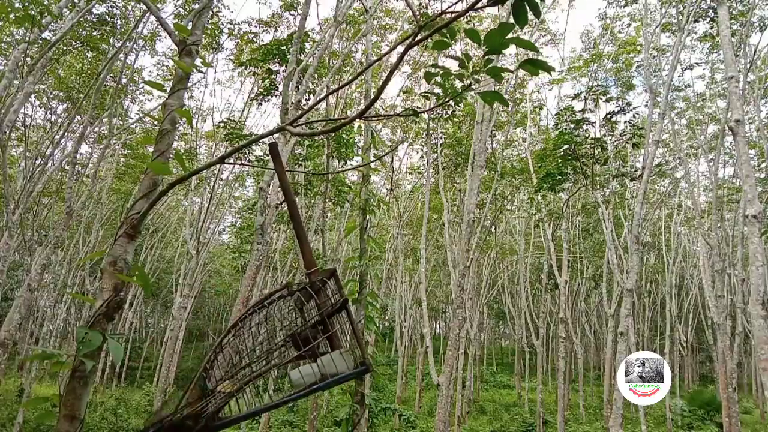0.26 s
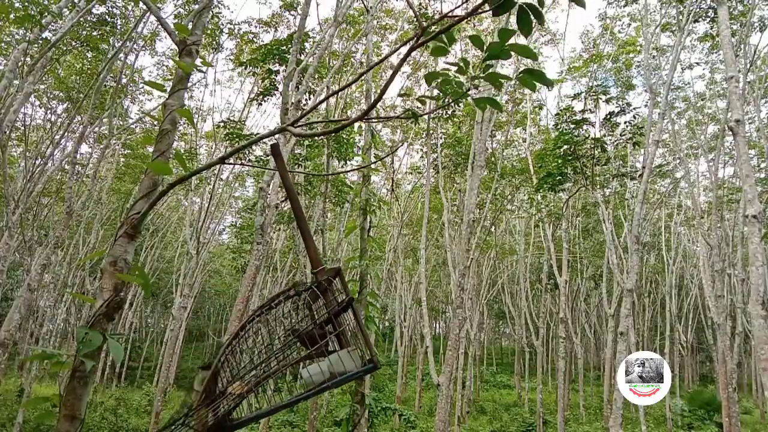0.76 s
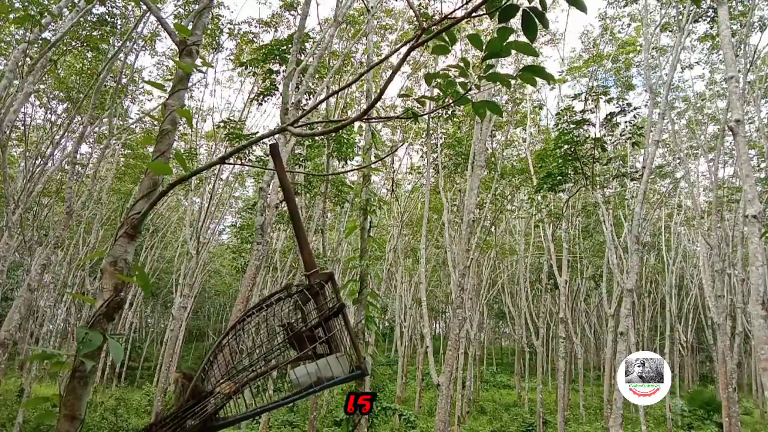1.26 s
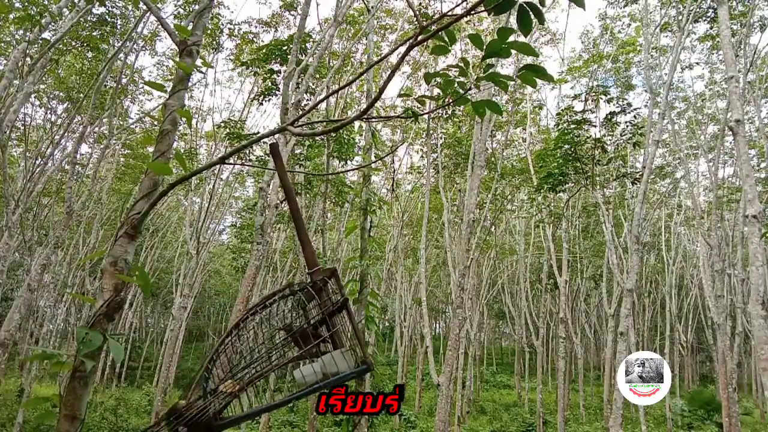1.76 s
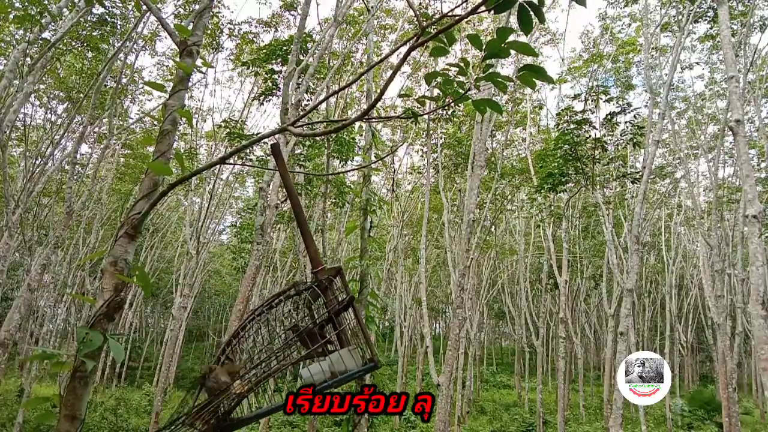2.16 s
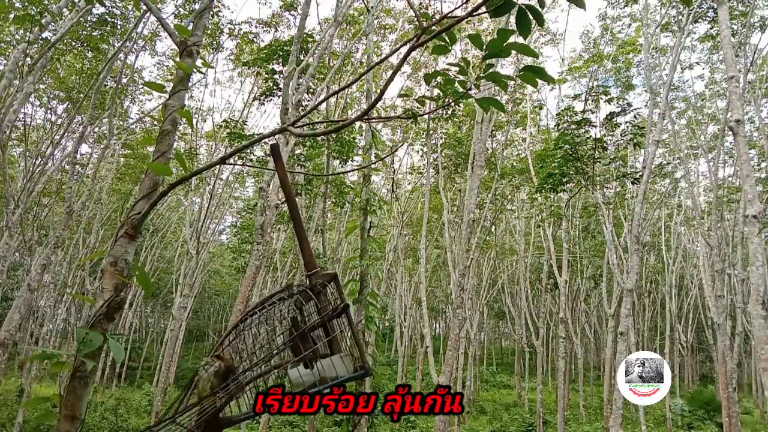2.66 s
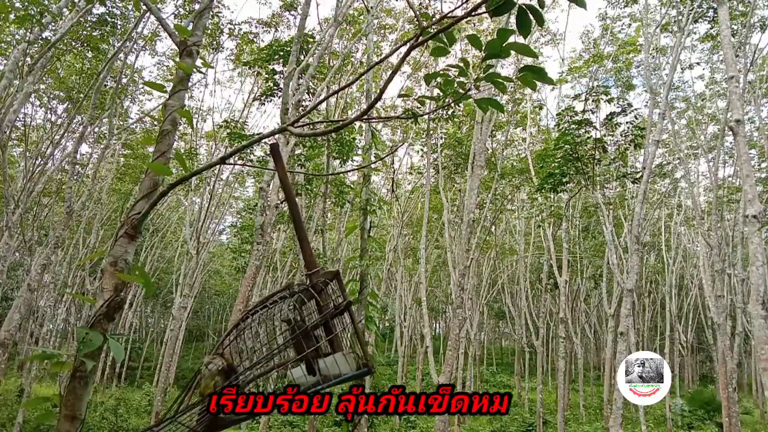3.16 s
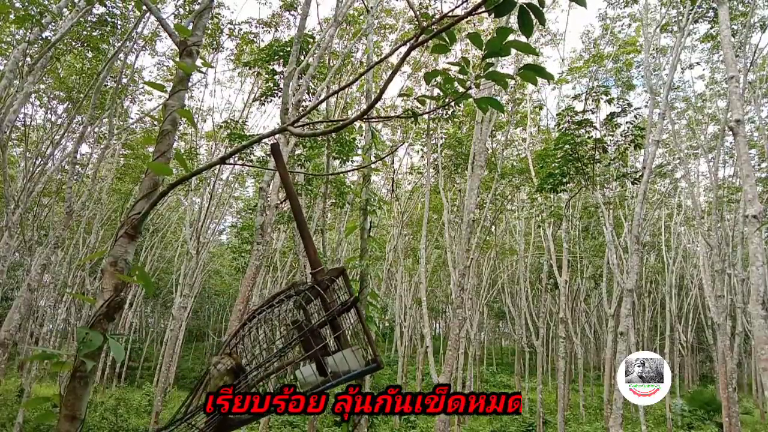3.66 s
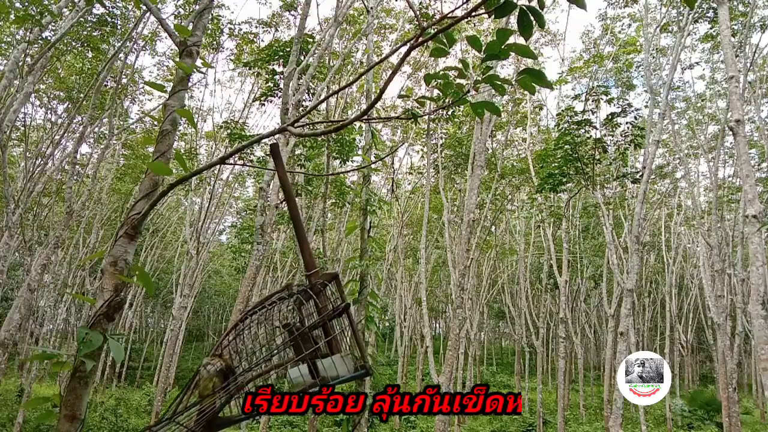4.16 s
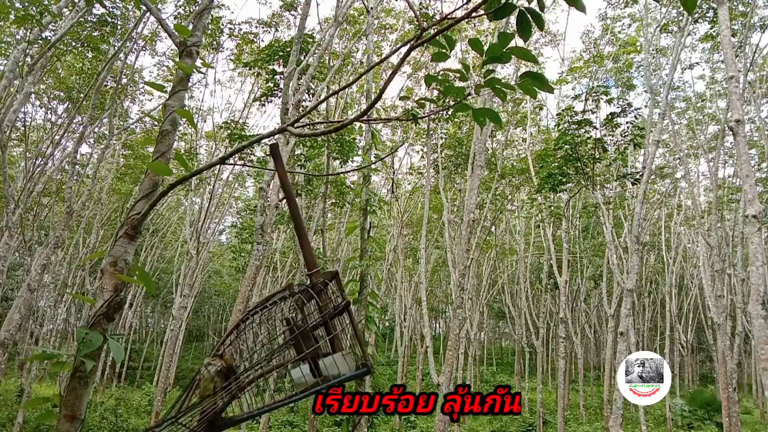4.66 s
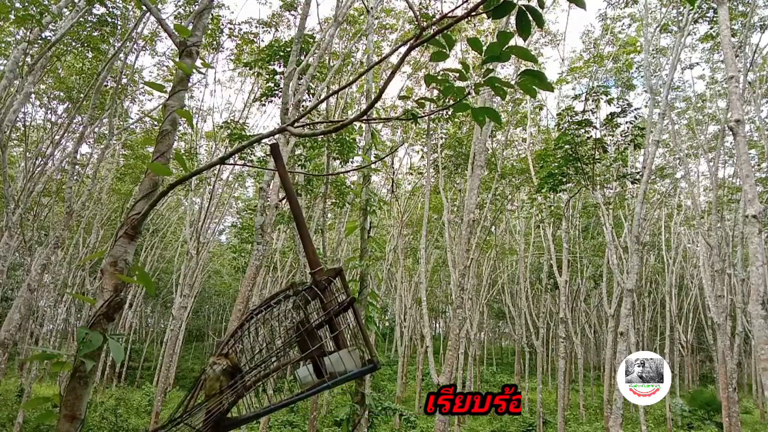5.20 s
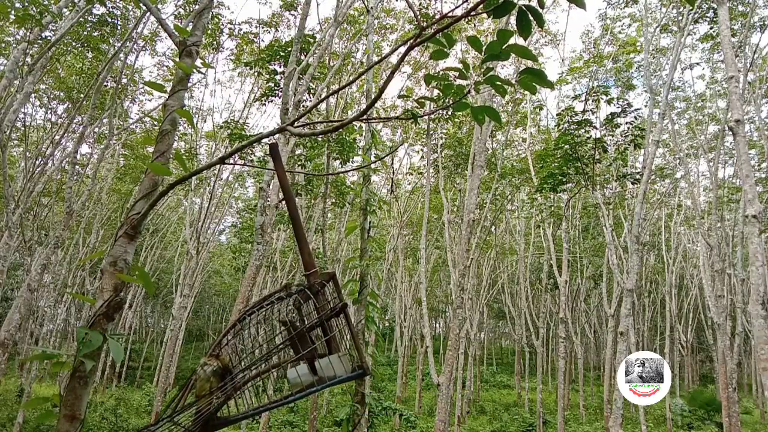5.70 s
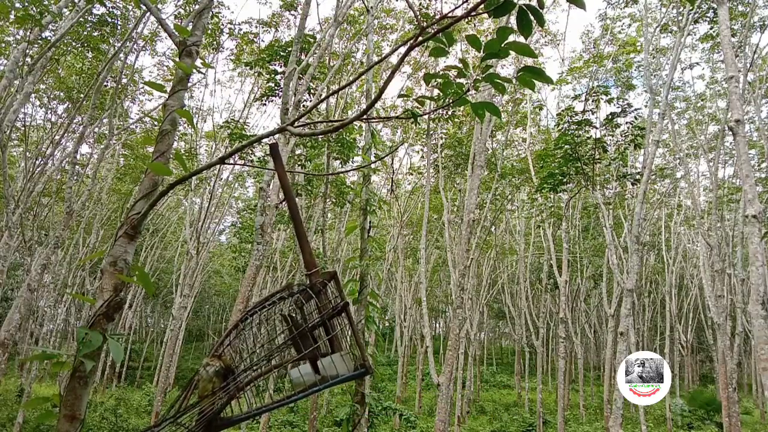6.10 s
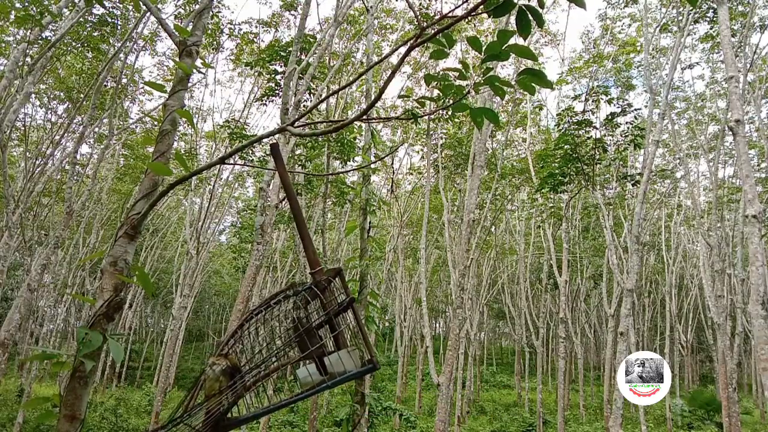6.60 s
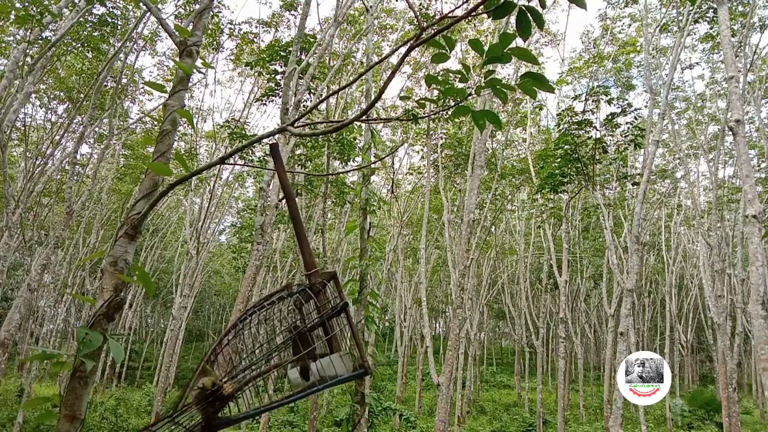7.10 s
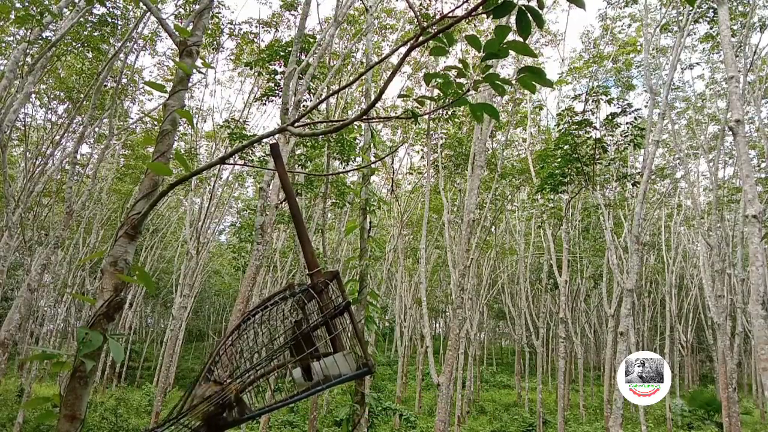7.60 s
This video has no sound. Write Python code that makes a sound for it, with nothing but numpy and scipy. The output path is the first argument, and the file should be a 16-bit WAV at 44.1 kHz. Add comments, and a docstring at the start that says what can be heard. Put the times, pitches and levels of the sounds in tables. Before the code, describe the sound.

Outdoors in a stand of trees, insects hold a thin, high buzz over a faint hiss of leaves. In the centre, a small bird flaps and scratches against its wire cage with sharp clicks and rustles. One loud upward chirp echoes briefly off the trunks. After a pause comes a softer run of twittering, slightly hoarse notes, followed by more fluttering and feathers brushing the mesh.

```python
"""A songbird in a small cage trap among trees, with insects buzzing and leaves hissing throughout.
First it scrabbles about, slapping its wings on the wire mesh and making the wires ring.
Near 2.7 s it gives one loud rising call, which echoes from the trunks. From about 4 s it sings a
quieter, chattering song of fast-bending notes. As the song ends, near 6.8 s, it is fluttering
again: its wings push soft puffs of air and its feathers scratch the mesh."""
import sys
import numpy as np
from scipy import signal
from scipy.fft import rfft, irfft, next_fast_len
from scipy.io import wavfile
from scipy.ndimage import uniform_filter1d, map_coordinates

SR = 44100
rng = np.random.default_rng(int(sys.argv[2]) if len(sys.argv) > 2 else 0)


def unload_wav(signal):
    """Save mono or channel-first audio to the path in sys.argv[1] as 16-bit WAV at rate SR, clipped to [-1, 1]."""
    wavfile.write(
        sys.argv[1],
        SR,
        np.round(np.clip(np.atleast_2d(signal).T, -1, 1) * 32767).astype(np.int16),
    )


N = 346185
TIME = np.arange(N) / SR


def amp(db):
    """Turn decibels into a number to multiply by."""
    return 10 ** (np.asarray(db) / 20)


def unit(x):
    """Scale a sound to an average (RMS) strength of 1."""
    return x / np.sqrt(np.mean(x ** 2) + 1e-20)


def noise():
    """Plain white hiss."""
    return rng.standard_normal(N)


def along(points, hz):
    """Read between (frequency, value) points on a log frequency scale."""
    f, value = np.transpose(points)
    return np.interp(np.log(hz + 1), np.log(f + 1), value)


def wobble(rate, size=N):
    """A smooth curve through `rate` random points a second."""
    points = rng.standard_normal(int(size * rate / SR) + 4)
    return map_coordinates(points, [np.arange(size) * rate / SR])


def filtered(x, response):
    """Turn each frequency f up or down by response(f)."""
    size = next_fast_len(N + SR // 2)
    return irfft(rfft(x, size) * response(np.fft.rfftfreq(size, 1 / SR)), size)[..., :N]


def peak(f, hz, width_hz):
    """A resonance: it lets through the frequencies near hz."""
    return 1j * f * width_hz / (hz * hz - f * f + 1j * f * width_hz)


# The tone colour of the open air: f/Hz, level/dB
AIR_COLOUR = [(25, -21.5), (100, -4.5), (250, -13.5), (2000, -24), (5500, -27), (9800, -30), (13000, -40)]
def air(db):
    """Far rumble and leaf hiss."""
    return amp(db) * unit(filtered(noise(), lambda f: amp(along(AIR_COLOUR, f))))


# The insects' high buzzes: f/Hz, width/Hz, relative level/dB
INSECT_BANDS = [(8025, 98, -19), (8367, 140, -3)]
def insects():
    """A chorus near 8 kHz pulsing about 66 times a second, and a fainter chirper far off."""
    bands = filtered(noise(), lambda f: sum(amp(db) * peak(f, hz, w) for hz, w, db in INSECT_BANDS))
    buzz = filtered(bands, lambda f: peak(f, 7848, 670) ** 3)
    pulse = 1 + 0.18 * np.sin(2 * np.pi * np.cumsum(66 + 0.6 * wobble(5.4)) / SR)
    far = filtered(noise(), lambda f: peak(f, 4710, 400) ** 2)
    return amp(-55 + 1.2 * wobble(15)) * unit(buzz * pulse) + amp(-77 + 4 * wobble(8)) * unit(far)


# How long an echo takes to fade by 60 dB: f/Hz, t/s
ECHO_FADE = [(1000, 0.37), (4000, 0.42), (9000, 0.34)]
def tree_echoes(x):
    """Sound bounces back from the trunks; the highest part dies first."""
    hz, t, spectrum = signal.stft(rng.standard_normal(SR // 2), SR, nperseg=256)
    fade = amp(-60 * t / along(ECHO_FADE, hz)[:, None])
    tail = signal.istft(spectrum * fade, SR, nperseg=256)[1]
    tail *= 1 + 5 * np.exp(-np.arange(len(tail)) / 900)  # near branches answer first and loudest
    return signal.fftconvolve(np.pad(x, (120, 0)), tail / np.linalg.norm(tail))[:N]


# Wing strokes pushing air: t/s, level/dB
WING_STROKES = [(6.501, -46), (6.742, -46.5), (7.072, -31), (7.123, -30.5), (7.173, -36), (7.265, -35.5),
                (7.453, -36)]
def wing_puffs(rise_s=0.007):
    """Each stroke is a soft puff near 90 Hz that starts fast and is gone in a few cycles."""
    out, age = np.zeros(N), TIME[:3000]
    swell = np.e * age / rise_s * np.exp(-age / rise_s)
    for start, db in WING_STROKES:
        hz = 88 * amp(rng.normal(0, 1.0))
        out[round((start - .008) * SR):][:len(age)] += amp(db) * swell * np.sin(2 * np.pi * hz * age)
    return out


# Bouts of restless rustling: t/s, length/s, relative level/dB
RUSTLE_BOUTS = [(0, 0.43, -42), (0.513, 0.15, -46.5), (0.776, 0.41, -50.5), (1.32, 0.06, -56.5),
                (1.538, 0.071, -57.5), (1.665, 0.022, -54.5), (1.82, 0.052, -50.5), (2.47, 0.28, -56.5),
                (6.99, 0.206, -49), (7.47, 0.12, -56.5)]
def feather_rustle(fade_db_per_s=380):
    """How strongly the feathers rub the mesh at each moment."""
    strength = np.zeros(N)
    for start, length, db in RUSTLE_BOUTS:
        outside_s = np.clip(np.maximum(start - TIME, TIME - start - length), 0, None)
        strength += amp(db - fade_db_per_s * outside_s)
    return strength


# Claws and beak flicking single wires: t/s, relative level/dB
WIRE_FLICKS = [(0.0538, -10.5), (0.7576, -21.5), (0.824, -18), (0.9836, -25.5), (0.9942, -22),
               (1.0535, -29), (1.1513, -31.5), (1.5355, -34), (1.9916, -20.5), (2.0124, -21),
               (6.8924, -31.5), (6.998, -34), (7.114, -31.5), (7.4774, -27)]
def wire_flicks():
    """Each flick gives a bare click and the loudness curve of a tiny snap."""
    clicks, snap = np.zeros((2, N))
    for start, db in WIRE_FLICKS:
        span = slice(round(start * SR), round(start * SR) + SR // 10)
        clicks[span.start] = amp(db + 5)
        snap[span] += amp(db - 14 - 60 * (TIME[span] - start) / .025)
    return clicks, snap


# Wings hitting the mesh: t/s, relative level/dB, extra level for the thud/dB
WING_SLAPS = [(0.0024, -16, -12), (0.0174, -21, -35), (0.0535, -24.5, -18), (0.137, -28, -33),
              (0.1935, -24.5, -10), (0.2655, -21, -33.5), (0.2993, -23, -42), (0.3215, -17.5, -20),
              (0.353, -27, -22), (0.437, -29, -1.5), (0.5164, -23.5, -35), (0.555, -29, -28),
              (0.6464, -30, -2), (0.845, -25, -3), (1.536, -28.5, -2.5), (1.989, -24, -2.5),
              (2.002, -22.5, -9), (2.028, -29, -9.5), (2.22, -28.5, -43), (2.2691, -25, -47),
              (2.3048, -32, -39), (2.464, -34.5, -17.5), (2.5245, -28, -37), (7.1821, -34.5, -10.5),
              (7.775, -36, -20)]
def wing_slaps():
    """Loudness curves for the parts of a slap: bright snap, crackling tail and dull thud."""
    snap, tail, thud = np.zeros((3, N))
    for start, db, thud_db in WING_SLAPS:
        span = slice(round(start * SR), round(start * SR) + SR // 3)
        age = TIME[span] - start
        rise = np.clip(age / .0025, 0, 1)
        snap[span] += amp(db - 8 - 60 * age / 0.05) * rise
        tail[span] += amp(db - 14 - 60 * age / 0.16) * rise
        thud[span] += amp(db + thud_db - 6.5 - 60 * age / 0.03)
    return snap, tail, thud


# The broad tone colour of the mesh: f/Hz, level/dB
MESH_COLOUR = [(40, -38), (160, -0.5), (600, -6), (3800, -6), (9300, -13), (13000, -18.5)]
# The pitches its wires ring at: f/Hz, width/Hz, relative level/dB
WIRE_RINGS = [(3690, 50, -3.5), (4680, 120, -5), (7460, 130, -15.5), (9280, 250, -4.5)]
def mesh(f):
    """How strongly the wire mesh answers at each frequency."""
    ringing = sum(amp(db) * peak(f, hz, width) for hz, width, db in WIRE_RINGS)
    return amp(along(MESH_COLOUR, f)) * (1 + ringing)


def shifting_contact(x, depth_db):
    """The bird keeps touching other parts of the mesh, so the tone colour wanders."""
    spectrum = signal.stft(x, nperseg=256)[2]
    patches = rng.standard_normal(spectrum.shape)
    for axis in (0, 1):
        patches = uniform_filter1d(patches, size=8, axis=axis)
    return signal.istft(spectrum * amp(depth_db * unit(patches)), nperseg=256)[1][:N]


def cage():
    """Slaps, flicks and scratching feathers ring the wires, with dull thuds underneath."""
    slap_snap, slap_tail, thud = wing_slaps()
    clicks, flick_snap = wire_flicks()
    rubbing = (slap_tail + feather_rustle()) * amp(2.14 * wobble(60))
    mesh_gain = np.std(filtered(noise(), mesh))
    grit = unit(noise() * amp(5 * wobble(1500)))  # feather barbs catch the wire unevenly
    snaps = (slap_snap + flick_snap) * noise() * amp(1.6 * wobble(550)) / mesh_gain
    hits = filtered(snaps + clicks, lambda f: mesh(f) / (1 + (900 / (f + 1)) ** 4))
    dull_noise = unit(filtered(noise(), lambda f: peak(f, 350, 1200) ** 2))
    # soft barbs sound duller and thin
    scratch = filtered(rubbing * grit / mesh_gain, lambda f: mesh(f) * peak(f, 1800, 9000))
    return shifting_contact(hits + scratch, depth_db=3) + thud * dull_noise


def note_loudness(t, pitch, length, attack_s, release_s, throat_hz=4000):
    """A note swells and fades, more slowly if long, and is stronger near the throat's own pitch."""
    rise = np.clip((t - t[0]) / (attack_s + 0.22 * length), 0, 1)
    fall = np.clip((t[-1] - t) / (release_s + 0.0872 * length), 0, 1)
    loss_db = 3 * np.log2(pitch / throat_hz) ** 2
    return rise * fall * amp(loss_db.min() - loss_db)


def voice_tone(phase, pitch, mean_hz, db, second_db):
    """The voice box makes a tone plus overtones at 2 to 5 times its pitch."""
    overtone_db = second_db - 17 * np.clip(np.log2(pitch / mean_hz), -.3, None)  # purer as it rises
    step_db = 6 + abs(second_db) / 2
    muffle_db_per_hz = .00035 * -db  # the closed beak dulls soft notes more
    tone = np.sin(phase)
    for k in range(2, 6):
        muffle_db = muffle_db_per_hz * np.clip(k * pitch - 3800, 0, None)
        tone += amp(overtone_db - step_db * (k - 2) - muffle_db) * np.sin(k * phase)
    if 1900 < mean_hz < 3800 or db > -22:  # fairly high or loud notes add a faint in-between tone
        tone += amp(-15.5) * (2500 / pitch) ** 2 * np.sin(1.5 * phase)
    return tone * np.sqrt(2 / (1 + amp(2 * overtone_db)))


# The bird's notes: level/dB, second harmonic against the first/dB, pitch path [(t/s, f/Hz), ...]
BIRD_NOTES = [ (-18.5, 22.5, [(2.664, 1225), (2.678, 1453), (2.692, 1306)]), (-9.5, -28.5, [(2.69, 2970),
              (2.708, 5850), (2.717, 6820)]), (-46.5, -3, [(3.946, 953), (3.965, 860)]),
              (-46, -3.5, [(3.983, 1162), (3.992, 1565), (4.003, 1210)]), (-36.5, -5.5, [(4.03, 1908),
              (4.039, 1996), (4.052, 1288), (4.072, 1288)]), (-44.5, -3.5, [(4.111, 1000), (4.122, 1188),
              (4.136, 1020)]), (-41, -3, [(4.156, 970), (4.172, 2470), (4.182, 2310)]),
              (-40, -1, [(4.27, 2310), (4.283, 2510)]), (-35, -5, [(4.3, 1750), (4.304, 2285), (4.31, 1577),
              (4.322, 1503), (4.33, 2320), (4.338, 2260)]), (-38, 2.5, [(4.427, 1187), (4.432, 1480),
              (4.438, 880), (4.446, 1563), (4.454, 1440)]), (-32, -6, [(4.523, 2240), (4.527, 2870),
              (4.534, 1485), (4.54, 4170), (4.544, 3100), (4.549, 4100)]), (-31.5, 0.5, [(4.678, 1133),
              (4.689, 1240), (4.695, 2860), (4.701, 2980)]), (-34, 1.5, [(4.718, 1470), (4.746, 1144)]),
              (-37.5, 2.5, [(4.872, 1403), (4.881, 1800), (4.909, 1843)]), (-44.5, -28.5, [(4.918, 2620),
              (4.96, 3580), (5.022, 4280), (5.045, 4310), (5.082, 6080)]), (-52.5, -23, [(4.99, 4980),
              (5.056, 5300)]), (-25, 4.5, [(5.3, 1880), (5.307, 4285), (5.315, 2160), (5.321, 3920),
              (5.325, 2770), (5.331, 4760)]), (-31.5, -2, [(5.476, 1510), (5.497, 2500), (5.506, 3950),
              (5.511, 2060)]), (-33.5, -3, [(5.585, 2110), (5.604, 2677), (5.613, 2560), (5.62, 1360)]),
              (-34, -15, [(5.621, 1440), (5.629, 2980), (5.634, 2384), (5.644, 2510)]),
              (-25, 10, [(5.724, 1340), (5.738, 1270), (5.746, 1880), (5.752, 3170), (5.759, 2770)]),
              (-30, 4, [(5.768, 3350), (5.774, 3350), (5.783, 2840)]), (-37, -3, [(5.801, 1625),
              (5.812, 2320), (5.826, 2200)]), (-50, -3.5, [(6.008, 1255), (6.168, 1325)]),
              (-42, -2, [(6.089, 1122), (6.109, 990)]), (-45.5, -3, [(6.126, 880), (6.14, 987),
              (6.153, 860)]), (-34, -20.5, [(6.252, 2004), (6.268, 2646), (6.28, 2006), (6.34, 1787),
              (6.374, 1680)]), (-47, -5, [(6.49, 1128), (6.532, 1648), (6.545, 1224)]),
              (-40.5, 7.5, [(6.561, 1305), (6.582, 1153)]), (-26.5, 0, [(6.713, 1320), (6.722, 2900),
              (6.73, 1157), (6.738, 2900), (6.743, 1740), (6.752, 3535), (6.777, 3644), (6.783, 3050)]),
              (-31.5, -5, [(6.798, 2364), (6.819, 2270)]), ]
def song(attack_s=0.0083, release_s=0.0042):
    """The call and the song: gliding notes, hoarse when low, with air rasping in the throat."""
    voice, breath = np.zeros((2, N))
    for db, second_db, path in BIRD_NOTES:
        times, hz = np.transpose(path)
        length, mean_hz = np.ptp(times), hz.mean()
        t = np.arange(times[0] - attack_s / 2, times[-1] + release_s / 2, 1 / SR)
        pitch = uniform_filter1d(np.interp(t, times, hz), size=90, mode="nearest")  # smooth bends
        level = amp(db) * note_loudness(t, pitch, length, attack_s, release_s)
        phase = 2 * np.pi * np.cumsum(pitch) / SR
        tone = voice_tone(phase, pitch, mean_hz, db, second_db)
        low = mean_hz < 1700
        churring = mean_hz < 1500 and length > .045
        if churring or (low and db > -22):  # strained notes alternate strong and weak cycles
            tone *= 1 + .4 * np.cos(phase / 2)
        hoarse = .6 if churring else .14 if low else .02
        roughness = np.sqrt(1 - hoarse) + np.sqrt(hoarse) * wobble(900, size=len(t))
        start = round(t[0] * SR)
        voice[start:][:len(t)] += level * tone * roughness
        breath[start:][:len(t)] += level * np.sqrt(hoarse) * 2000 / pitch
    rasp = unit(filtered(noise(), lambda f: peak(f, 2100, 2800) ** 3 + amp(-34)))
    voice += amp(-9) * breath * rasp
    return filtered(voice, lambda f: 1 / (1 + (750 / (f + 1)) ** 8))  # a small throat gives no bass


# Tone colour of the faint stereo width: f/Hz, level/dB
WIDTH_COLOUR = [(60, -10), (1000, 3.5), (4000, 1), (14000, -12.5)]
def scene():
    """All is centred but for a faint side signal: a delayed copy of the cage noise, with echoes and hiss,
    shaped in tone colour and added to one channel and taken from the other."""
    voice, scrabble = song(), cage()
    middle = voice + amp(-11) * tree_echoes(voice) + scrabble + wing_puffs() + insects() + air(db=-60.5)
    width = amp(-36) * np.roll(scrabble, 300) + amp(-44) * tree_echoes(voice) + air(db=-69)
    side = filtered(width, lambda f: amp(along(WIDTH_COLOUR, f)))
    return np.array([middle + side, middle - side])


def record(dry, top_hz=15600):
    """The microphone housing rings near 1.25 and 15 kHz and dips at 6.3 kHz; nothing passes top_hz."""
    def housing(f):
        return 1 + 2.3 * peak(f, 1250, 60) - 0.65 * peak(f, 6300, 600) + 2.1 * peak(f, 14950, 1200)
    return filtered(dry, lambda f: housing(f) * (f < top_hz))


dry = scene()
out = record(dry)
unload_wav(out)
```